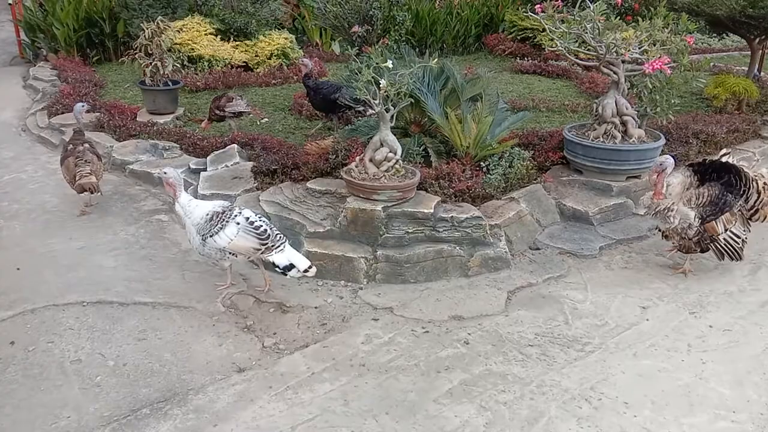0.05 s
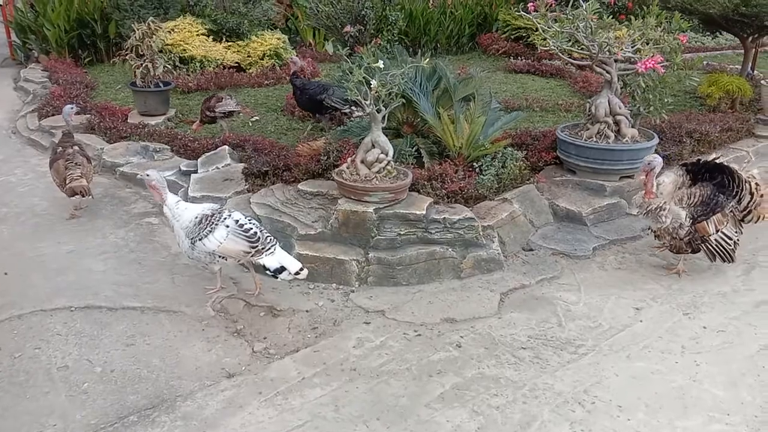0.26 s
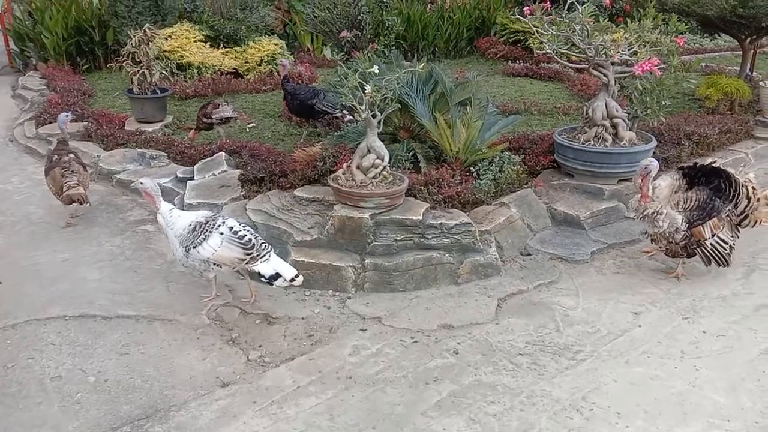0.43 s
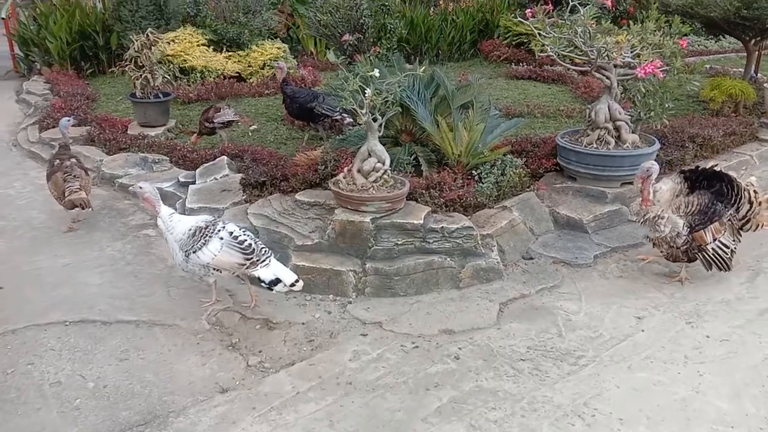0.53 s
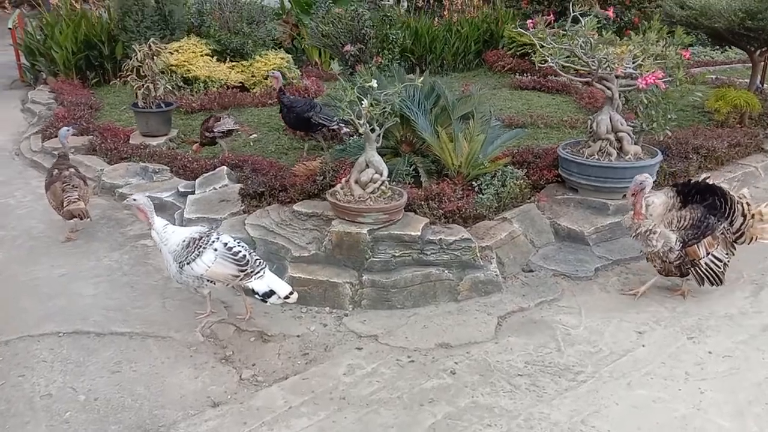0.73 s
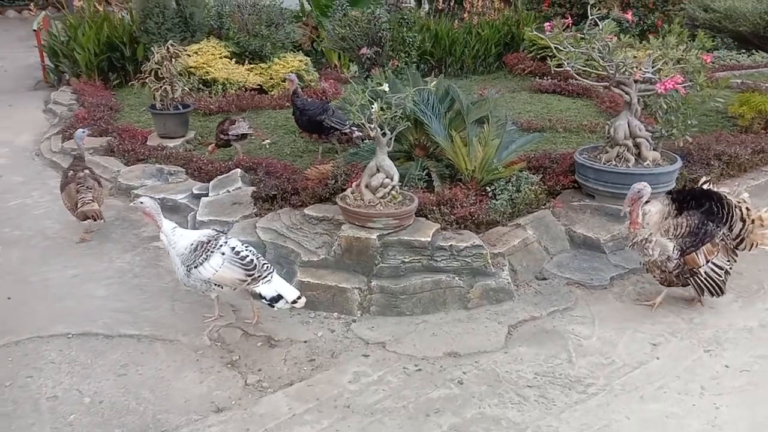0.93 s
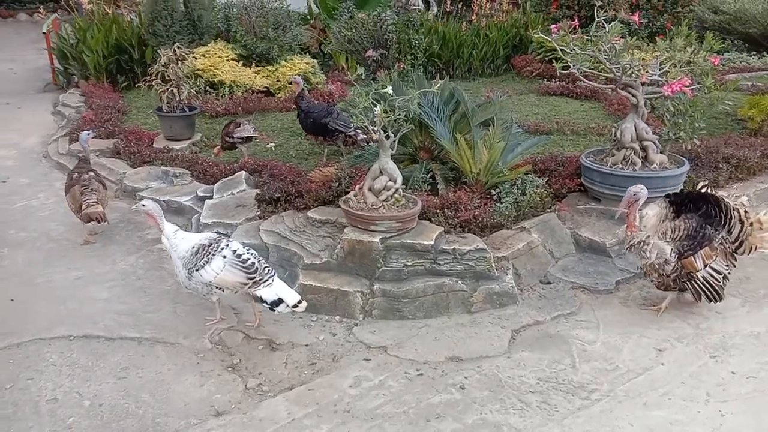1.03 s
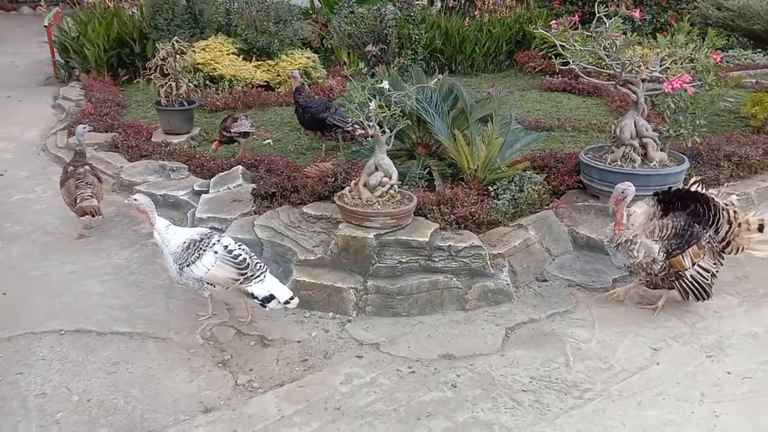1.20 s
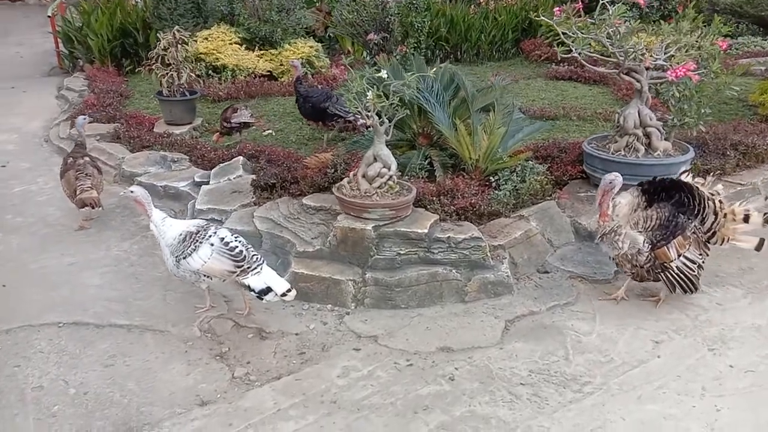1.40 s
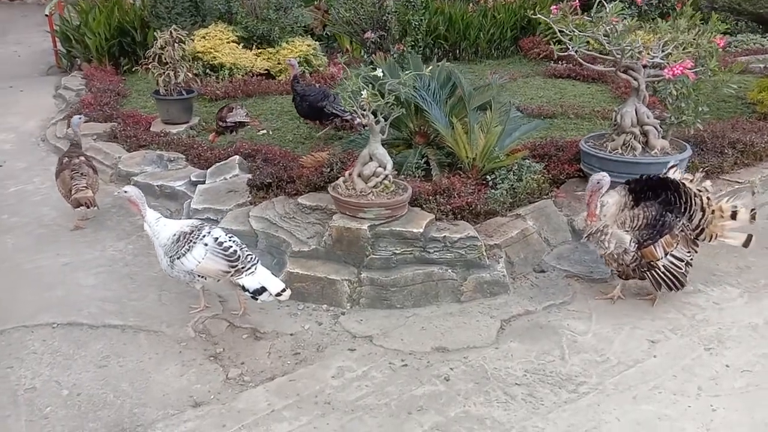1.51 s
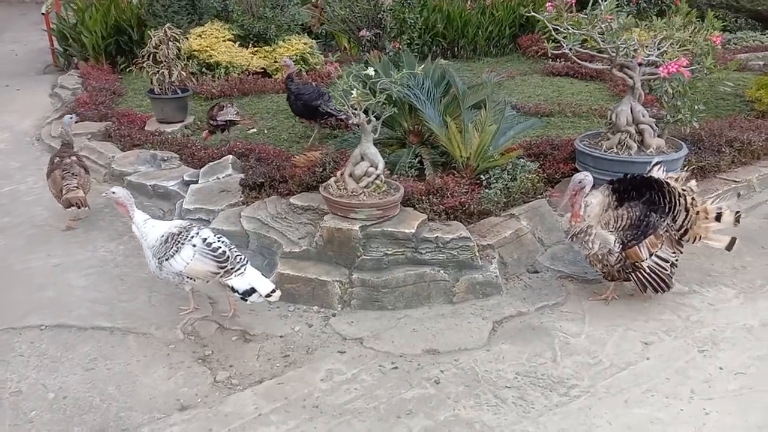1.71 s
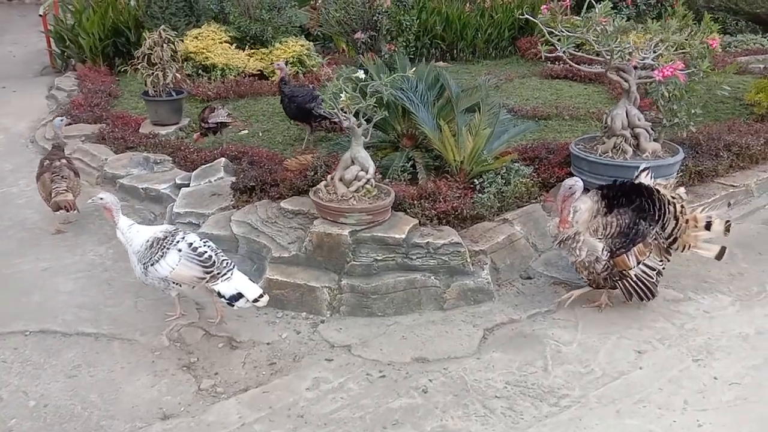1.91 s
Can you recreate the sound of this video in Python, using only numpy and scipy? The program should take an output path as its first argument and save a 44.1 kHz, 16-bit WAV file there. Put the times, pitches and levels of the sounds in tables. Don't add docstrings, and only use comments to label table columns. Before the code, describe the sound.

Near turkey hens yelp four times in short, low, almost pure hoots, with two far gliding bird whistles, then a crackling feather scrape on stone; faint chirps and distant town rumble, handheld microphone outdoors.

```python
import sys
import numpy as np
from scipy import signal
from scipy.fft import rfft, irfft, next_fast_len
from scipy.io import wavfile
from scipy.ndimage import uniform_filter1d

SR = 44100
rng = np.random.default_rng(int(sys.argv[2]) if len(sys.argv) > 2 else 0)


def dump_mix(stems):
    frames = np.atleast_2d(stems).T
    limited = np.clip(frames, -1, 1)
    pcm = np.round(limited * 32767).astype(np.int16)
    wavfile.write(sys.argv[1], SR, pcm)


def boost_factor(decibels):
    exponent = np.asarray(decibels, float) / 20
    return 10 ** exponent


N = 85995
T = np.arange(N) / SR


def level(x, db):
    return x * boost_factor(db) / np.sqrt(np.mean(x ** 2))


def shape(x, gain):
    n = next_fast_len(N + 8192)
    hz = np.arange(n // 2 + 1) * SR / n + 1
    return irfft(rfft(x, n) * gain(hz), n)[:N]


def points(table):
    hz, db = np.array(table, float).T
    return lambda f: boost_factor(np.interp(np.log(f), np.log(hz), db))


def band(hz, width_hz):
    noise = rng.standard_normal(N)
    return level(shape(noise, lambda f: np.exp(-2 * ((f - hz) / width_hz) ** 2)), 0)


def walk(rate):
    hold = int(SR / rate)
    steps = np.repeat(rng.standard_normal(N // hold + 1), hold)
    return 1.265 * uniform_filter1d(uniform_filter1d(steps, hold), hold)[:N]


def ring(x, t60, early_s):
    t = T[:SR]
    scatter_db = 8.8 * rng.standard_normal(SR)
    h = rng.standard_normal(SR) * boost_factor(scatter_db - 60 * t / t60) * (1 - np.exp(-t / early_s))
    return signal.fftconvolve(x, h / np.sqrt(np.sum(h ** 2)))[:N]


def voice(curve, partials_db, wobble=0.0021):
    s, hz, db = np.array(curve, float).T

    def smooth(values):
        return uniform_filter1d(np.interp(T, s, values), 180)

    phase = 2 * np.pi * np.cumsum(smooth(hz) * (1 + wobble * walk(61.43))) / SR
    edge = np.clip(np.minimum(T - s[0], s[-1] - T) / 0.0013, 0, 1)
    tone = np.sin(phase)
    for k, partial_db in enumerate(partials_db):
        tone = tone + boost_factor(partial_db) * np.sin((k + 2) * phase)
    return np.sqrt(2) * boost_factor(smooth(db)) * edge * tone


def slurs(rows, wobble):
    x = 0
    for s, length, from_hz, to_hz, db in rows:
        u = np.clip((T - s) / length, 0, 1)
        hz = (from_hz + (to_hz - from_hz) * u ** 1.3) * (1 + wobble * walk(150))
        swell = np.sin(np.pi * u) ** 0.7
        x = x + boost_factor(db) * swell * np.sin(2 * np.pi * np.cumsum(hz) / SR)
    return x


# f/Hz, level per Hz/dB
TOWN_COLOUR = [(30, -27.5), (55, -4), (200, -9), (400, -12.5), (750, -19), (2500, -24), (4500, -32),
               (6500, -31)]
# f/Hz, width/Hz, level/dB rms
TOWN_RESONANCES = [(198, 12, -78), (1265, 115, -72), (2270, 250, -99), (1080, 170, -76.5)]


def town():
    floor, colour = 0, points(TOWN_COLOUR)
    for hz in 30 * 2 ** np.arange(0, 9.5, .5):
        def bell(f):
            return colour(f) * np.exp(-(np.log2(f / hz) / .5) ** 2)
        floor = floor + shape(rng.standard_normal(N), bell) * boost_factor(3.65 * walk(9.27))
    x = level(floor, -62)
    for hz, width_hz, db in TOWN_RESONANCES:
        x = x + boost_factor(db + 0.35 * walk(4.7)) * band(hz, width_hz)
    return x


# t/s, level/dB
HUM_LEVEL = [
    (0.0, -66),
    (0.38, -59),
    (1.95, -70),
]


def motor():
    hum_hz = 284.9
    tone = np.sin(2 * np.pi * np.cumsum(hum_hz * (1 + 0.0017 * walk(7.3))) / SR)
    hum = tone + 0.13 * band(hum_hz, 18)
    return np.sqrt(2) * boost_factor(np.interp(T, *np.array(HUM_LEVEL).T)) * hum


# t/s, level/dB, f/Hz
CASE_KNOCKS = [(.34, -51, 105.3), (0.941, -66, 75), (1.005, -56, 70), (1.16, -66, 90), (.61, -55.5, 110),
               (1.59, -57, 70), (0.554, -57, 64), (.755, -54, 70), (.97, -62.5, 70), (1.53, -53, 84.6),
               (1.77, -58, 73)]


def knocks():
    x, knock_s = 0, 0.012
    for s, db, hz in CASE_KNOCKS:
        x = x + boost_factor(db) * np.exp(-((T - s) / knock_s) ** 2) * np.sin(2 * np.pi * hz * T)
    return x


# t/s, level/dB
INSECT_LEVEL = [(0, -85), (.28, -75), (.83, -75), (.88, -84), (1.3, -76), (1.75, -71.5), (1.95, -82.5)]


def insect():
    centre_hz, width_hz, sweep_hz = 9343, 1100, 493
    strokes_per_s, duty = 98, .3
    phase = np.cumsum(strokes_per_s * (1 + 0.01 * walk(3))) / SR % 1 - .5
    hz = centre_hz * (1 + 0.004 * walk(43)) - sweep_hz * phase
    pulse = np.exp(-2 * (phase / duty) ** 2) * boost_factor(1.4 * walk(90))
    stroke = pulse * np.sin(2 * np.pi * np.cumsum(hz) / SR)
    buzz = level(stroke, 0) + boost_factor(-4.0) * band(centre_hz, width_hz)
    return buzz * boost_factor(np.interp(T, *np.array(INSECT_LEVEL).T) + 5.5)


# t/s, length/s, from f/Hz, to f/Hz, level/dB
FAR_CHIRPS = [(.025, .11, 6150, 5450, -69), (.22, .075, 5650, 5150, -74), (.3, .075, 5600, 5200, -70),
              (.55, .08, 5600, 6100, -75), (.63, .045, 6200, 6300, -73), (.67, .035, 5500, 5400, -74),
              (.775, .08, 5600, 5100, -75), (.87, .07, 6250, 6200, -76), (.985, .055, 5900, 5450, -76),
              (1.07, .08, 6050, 5500, -76), (1.29, .04, 6200, 6150, -72), (1.0, .08, 3850, 3800, -77),
              (1.918, .022, 1280, 1270, -66), (1.925, .03, 6200, 6150, -72), (1.13, .06, 3900, 3800, -76),
              (1.37, .055, 4450, 5050, -75), (1.4, .14, 5050, 4950, -69), (1.79, .08, 4950, 5000, -78)]


def songbirds():
    chirps = slurs(FAR_CHIRPS, 0.018)
    return boost_factor(3.6) * chirps + boost_factor(1.0) * ring(chirps, t60=.24, early_s=0.0015)


# t/s, f/Hz, level/dB
RISING_WHISTLE = [(.305, 1662, -60), (.345, 1700, -54), (.39, 1745, -60), (.43, 1985, -51),
                  (.464, 2125, -39), (.478, 2190, -40), (.485, 2310, -50), (.538, 1920, -46),
                  (.552, 1830, -64)]
FALLING_WHISTLE = [(1.386, 2344, -70.5), (1.416, 2440, -69.5), (1.443, 2545, -49.5), (1.462, 2560, -64),
                   (1.493, 2549, -44), (1.53, 2082, -50.5), (1.588, 1242, -48), (1.607, 1221, -45.5),
                   (1.63, 1240, -76)]
AFTERTHOUGHT = [(1.639, 1210, -70), (1.664, 1314, -49), (1.72, 1313, -56), (1.77, 1318, -57.5),
                (1.8, 1315, -92)]
# echo t/s, level/dB, second echo t/s, level/dB, diffuse ring level/dB
WALL_ECHOES = [
    (.019, -12, .047, -12, -6),
    (.014, -1, .04, -5, 0),
]


def whistler():
    ring_low_hz = 1200

    def low_cut(f):
        return 1 / np.sqrt(1 + (ring_low_hz / f) ** 6)

    x = voice(AFTERTHOUGHT, (), wobble=0.016) * boost_factor(5 * np.clip(walk(90), -2.5, 1))
    glides = (RISING_WHISTLE, FALLING_WHISTLE)
    for curve, walls, flutter_db in zip(glides, WALL_ECHOES, (2, 5)):
        near_s, near_db, far_s, far_db, ring_db = walls
        call = voice(curve, (), wobble=0.0078)
        for delay_s, db in ((0, 0), (near_s, near_db), (far_s, far_db)):
            flutter = flutter_db * np.clip(walk(110), -2.5, 1)
            x = x + boost_factor(db + flutter) * np.interp(T - delay_s, T, call)
        x = x + boost_factor(ring_db) * shape(ring(call, t60=0.59, early_s=0.027), low_cut)
    return x


# t/s, peak level/dB, f/Hz, t60/s
QUILL_SNAPS = [(1.6178, -34, 7150, 0.015), (1.6182, -36, 7600, 0.018), (1.6185, -39.5, 3180, 0.0099),
               (1.6188, -34, 1900, 0.0092), (1.637, -41, 2970, 0.014), (1.639, -44, 5930, 0.014),
               (1.645, -40, 7460, 0.014), (1.653, -43, 6740, 0.008), (1.659, -37, 6800, 0.0083),
               (1.665, -41, 4420, 0.011), (1.671, -43, 7100, 0.0089), (1.676, -32, 7530, 0.016),
               (1.677, -39, 5410, 0.012), (1.678, -39.5, 3120, .012), (1.69, -41, 7430, .012),
               (1.691, -55, 4870, 0.0099), (1.728, -48, 2330, .015), (1.738, -55, 4940, .015),
               (1.757, -47, 7400, 0.011), (1.758, -51, 4800, .01), (1.765, -42, 7460, 0.019),
               (1.766, -49, 4900, 0.013), (1.8738, -52, 2180, 0.034), (1.877, -53, 4000, .012),
               (1.878, -59, 5200, 0.019), (1.884, -56, 2244, .015), (1.891, -53, 5280, 0.014),
               (1.896, -55, 5630, 0.01), (1.908, -52, 5230, 0.015), (1.913, -51, 4980, .012),
               (1.933, -60, 2250, 0.011), (1.9426, -48, 5000, 0.011), (1.945, -57, 2400, .012),
               (1.946, -56, 3600, .012), (.5435, -49, 3200, 0.011), (.549, -42, 2580, 0.013),
               (1.236, -53, 3470, .015), (1.249, -51, 3710, 0.013)]


def snaps():
    x, rise_s, split = 0, 0.00034, .04
    for s, db, hz, t60 in QUILL_SNAPS:
        t = np.clip(T - s, 0, .1)
        pair = np.sin(2 * np.pi * hz * t) + 0.87 * np.sin(2 * np.pi * hz * (1 + split) * t)
        x = x + boost_factor(db - 60 * t / t60) * (1 - np.exp(-t / rise_s)) * pair
    return x + boost_factor(-13) * ring(x, t60=0.16, early_s=.004)


# f/Hz, width/Hz, level/dB
QUILL_RESONANCES = [(2143, 700, 10.5), (3300, 920, 4), (5240, 590, 5.5), (7860, 920, 8)]


def quills(f):
    top_hz, top_db = 7900, -9
    db = top_db / (1 + (top_hz / f) ** 30)
    for hz, width_hz, peak_db in QUILL_RESONANCES:
        db = db + peak_db * np.exp(-2 * ((f - hz) / width_hz) ** 2)
    return boost_factor(db)


# t/s, length/s,
# level/dB, centre f/Hz, width/octaves
FEATHER_SCUFFS = [(0.105, 0.01, -65, 3020, 0.5), (0.5405, 0.013, -53.5, 2870, 0.7),
                  (0.553, 0.04, -54.5, 1870, 0.69), (1.228, 0.034, -57.5, 3710, 0.43),
                  (1.302, 0.0078, -58, 2250, 0.66), (1.31, 0.051, -70, 3500, 0.28),
                  (1.6163, 0.0023, -44.5, 3440, 3.8), (1.624, 0.049, -48, 3560, 1.46),
                  (1.675, 0.0053, -44, 5370, 1.9), (1.688, 0.067, -52.5, 2700, 1.15),
                  (0.793, 0.054, -68, 3600, 0.14), (0.642, 0.15, -71, 3300, 0.72),
                  (0.906, 0.082, -71, 3560, 0.14), (1.764, 0.0043, -48, 4530, 1.5),
                  (1.866, 0.021, -70, 2320, 0.94), (1.875, 0.14, -64.5, 3630, 0.93),
                  (1.943, 0.0072, -57, 3250, 0.65), (0.732, 0.0065, -61, 14200, .2),
                  (1.635, 0.057, -59.5, 11600, 0.063), (0.398, .28, -68, 401, 0.29),
                  (1.885, .02, -68, 11400, .07)]


def scuffs():
    barbs_per_s, scatter_db = 2500, 6.5
    x = 0
    for s, length, db, hz, octaves in FEATHER_SCUFFS:
        def colour(f):
            return quills(f) * np.exp(-.5 * (np.log2(f / hz) / octaves) ** 2)
        chance, strength = rng.random((2, N))
        sign = np.sign(rng.standard_normal(N))
        ticks = (chance < barbs_per_s / SR) * boost_factor(scatter_db * strength) * sign
        rub = level(ticks, 0) + 0.75 * rng.standard_normal(N)
        rasp = level(shape(rub, colour), db)
        attack_s, tail_s = .1 * length, min(0.015, length / 2)
        after = np.clip(T - s - length, 0, None)
        sag = 0.14 * np.clip((T - s) / length, 0, 1)
        gate = np.clip((T - s) / attack_s, 0, 1) * np.exp(-after / tail_s - sag)
        uneven_db = 2.9 * min(length / 0.035, 1) * np.clip(walk(130), -2, 1.3)
        x = x + rasp * gate * boost_factor(uneven_db)
    return x + boost_factor(-9.5) * ring(x, t60=0.099, early_s=0.0049)


# t/s, length/s, from f/Hz, to f/Hz, level/dB
SOFT_NOTES = [(.672, .024, 918, 905, -45), (.699, .026, 904, 885, -46), (.729, .017, 900, 880, -55),
              (.757, .07, 885, 875, -50), (.578, .016, 1270, 1215, -50), (1.0, .055, 960, 950, -59),
              (.335, .07, 900, 890, -61), (.9, .05, 400, 390, -60)]
# t/s, f/Hz, level/dB
HEN_YELPS = [
    [(.17, 970, -67.5), (.182, 975, -47), (.205, 936, -43), (.215, 949.5, -45.5), (.26, 908, -42),
     (.312, 891, -39.5), (.326, 955, -40.5), (.338, 1040, -66)],
    [(.563, 990, -50.5), (.58, 930, -35), (.6, 869, -32.5), (.614, 853, -28.5), (.624, 952, -32),
     (.632, 906, -29), (.65, 845, -29), (.66, 976, -35), (.669, 998, -63)],
    [(.905, 959, -70), (.92, 1046, -42.5), (.935, 990, -35), (.945, 896, -36), (.965, 925, -34),
     (.982, 932, -34.5), (.994, 1014, -46), (1.005, 980, -59.5)],
    [(1.298, 1007, -77), (1.309, 985, -44.5), (1.321, 977, -40.5), (1.338, 937, -46), (1.355, 953, -41),
     (1.367, 970, -48), (1.378, 1030, -64)],
]
# 2nd partial level/dB, 3rd partial level/dB, yard ring level/dB
HEN_TONES = [(-42.5, -54, -47.5), (-27, -71, -28.5), (-37, -39, -50), (-51, -29, -46)]


def hens():
    x = slurs(SOFT_NOTES, 0.013) * boost_factor(3.0 * walk(69))
    for curve, (second_db, third_db, ring_db) in zip(HEN_YELPS, HEN_TONES):
        yelp = voice(curve, (second_db, third_db))
        x = x + yelp + boost_factor(ring_db) * ring(yelp, t60=0.95, early_s=0.1)
    return x


def scene():
    background = town() + motor() + knocks() + insect() + songbirds()
    turkeys = whistler() + snaps() + scuffs() + hens()
    return (background + turkeys)[None]


# f/Hz, level/dB
MIC_COLOUR = [(7300, 0), (7900, -13.5), (8400, -17.5), (9000, -7.5), (10300, -6), (11200, -14.5),
              (13800, -16), (14800, -9)]


def microphone(x):
    top_hz, colour = 15550, points(MIC_COLOUR)
    return shape(x, lambda f: colour(f) * (f < top_hz))


def band_limit(x):
    return signal.sosfilt(signal.butter(12, 15670, fs=SR, output="sos"), x)


def record(dry):
    mix = microphone(dry[0])[None]
    return band_limit(mix)


dry = scene()
out = record(dry)
dump_mix(out)
```